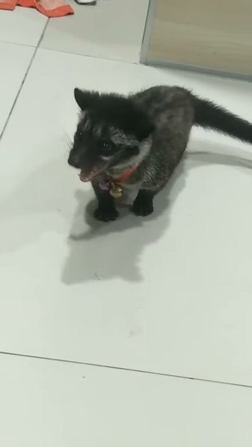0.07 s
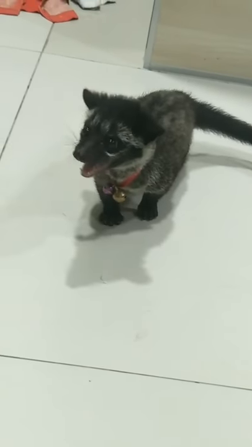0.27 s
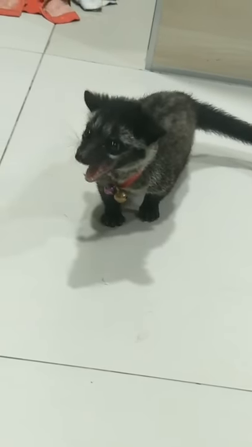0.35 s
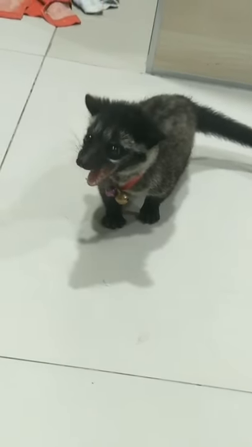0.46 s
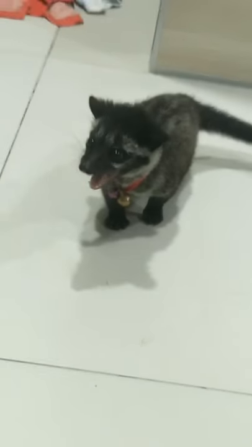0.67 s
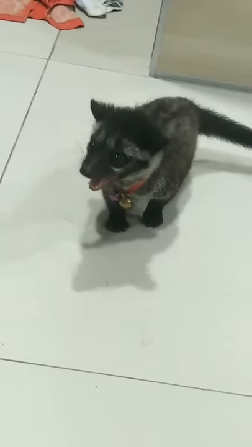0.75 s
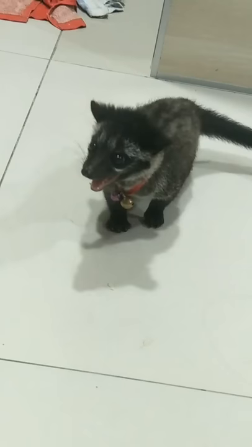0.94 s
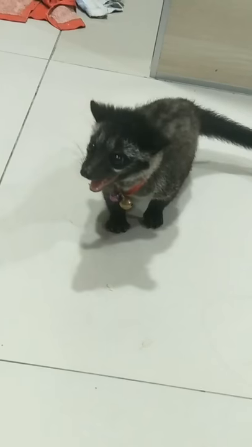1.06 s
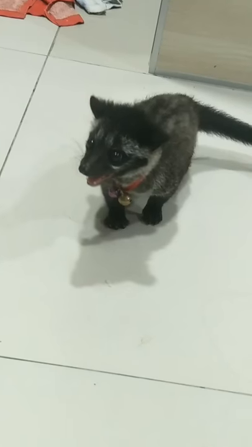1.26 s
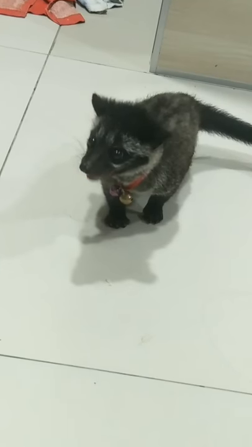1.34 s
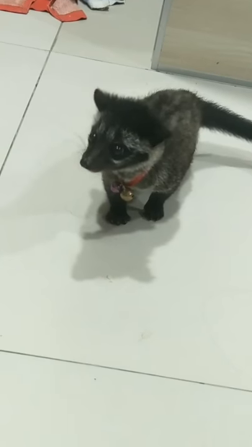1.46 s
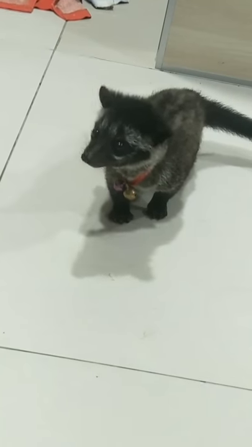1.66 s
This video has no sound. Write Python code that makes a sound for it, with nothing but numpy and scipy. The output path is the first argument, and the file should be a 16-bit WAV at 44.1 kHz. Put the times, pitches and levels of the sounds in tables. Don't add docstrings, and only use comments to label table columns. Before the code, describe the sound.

A small civet calls close by in a quick run of bright arched chirps, some with rough lead-ins, the last ones running together and sinking to a low murmur; hard tiled room, faint rumble behind.

```python
import sys
import numpy as np
from scipy import signal
from scipy.fft import rfft, irfft
from scipy.io import wavfile
from scipy.ndimage import uniform_filter1d

SR = 44100
rng = np.random.default_rng(int(sys.argv[2]) if len(sys.argv) > 2 else 0)


def volts_from_decibels(level):
    exponent = np.asarray(level, float) / 20
    return 10 ** exponent


def store_pcm(level_fs):
    pcm = np.round(np.clip(level_fs, -1, 1) * 32767).astype(np.int16)
    wavfile.write(sys.argv[1], SR, np.atleast_2d(pcm).T)


N = 74970


def at_hz(points, hz):
    f, value = np.transpose(points)
    return np.interp(np.log(hz + 1), np.log(f + 1), value)


def unit(x):
    return x / np.sqrt(np.mean(x ** 2) + 1e-20)


def wobble(n, size):
    smooth = uniform_filter1d(rng.standard_normal(n), size)
    return unit(uniform_filter1d(smooth, size))


def resonate(x, hz, width_hz):
    turn = np.exp(2j * np.pi * np.cumsum(hz * np.ones(len(x))) / SR)
    r = np.exp(-np.pi * width_hz / SR)
    return 2 * (turn * signal.lfilter([1 - r], [1, -r], x / turn)).real


def ring(noise, bands):
    return sum(volts_from_decibels(db) * unit(resonate(resonate(noise, hz, width_hz), hz, width_hz))
               for hz, width_hz, db in bands)


# frequency in Hz, level in dB per Hz.
AIR_SPECTRUM = [(25, -25), (50, -53), (100, 3), (190, 0), (400, -8), (900, -12.5), (1900, -12), (2600, -44)]
# frequency in Hz, width in Hz, level in dB.
HIGH_BANDS = [(1309, 24, -77.5), (2320, 92, -78.5), (4900, 230, -84), (5390, 77, -80.5), (5650, 250, -97),
              (7230, 280, -82)]


def room_tone():
    level_db, patch_db = -57, 5
    frames, hz = N // 256 + 5, np.fft.rfftfreq(1024, 1 / SR)
    a, b, patches = rng.standard_normal((frames, 513, 3)).T
    patches = uniform_filter1d(patches, size=8, axis=0)
    patches = unit(uniform_filter1d(patches, size=14, axis=1))
    z = (a + 1j * b) * volts_from_decibels(at_hz(AIR_SPECTRUM, hz)[:, None] + patch_db * patches)
    air = volts_from_decibels(level_db) * unit(signal.istft(z, nperseg=1024, noverlap=768)[1][:N])
    return air + ring(rng.standard_normal(N), HIGH_BANDS)


# time in seconds, level in dB, drone pitch in Hz.
RUMBLE_SWELL = [(0.0, -80, 212), (0.118, -57, 217), (0.16, -60.5, 217), (0.316, -69, 234),
                (0.676, -60, 214), (0.78, -47, 233), (0.932, -52.5, 237), (1.116, -54.5, 225.5),
                (1.182, -48.5, 261), (1.514, -51.5, 225), (1.594, -70, 231), (1.642, -55, 222),
                (1.7, -58.5, 216)]
# frequency in Hz, width in Hz, level in dB.
ROOM_MODES = [(216.4, 22, -11), (263, 84, -12.5), (313.7, 10, -13), (596, 250, -17), (1180, 16, -34)]


def rumble():
    drone_width_hz, drone_db = 37.5, -2
    hum_hz, hum_db = 59.4, -70
    s, db, drone_hz = np.transpose(RUMBLE_SWELL)
    t, noise = np.arange(N) / SR, rng.standard_normal(N)
    modes = ring(noise, ROOM_MODES)
    hz = np.interp(t, s, drone_hz)
    drone = resonate(resonate(noise[::-1], hz, drone_width_hz), hz, drone_width_hz)
    drone_power = abs(uniform_filter1d(drone ** 2, size=3000)) + 1e-12
    steady_drone = volts_from_decibels(drone_db) * drone / np.sqrt(drone_power)
    hum = volts_from_decibels(hum_db) * np.sqrt(2) * np.sin(2 * np.pi * hum_hz * t)
    return volts_from_decibels(np.interp(t, s, db)) * (modes + steady_drone) + hum


# frequency in Hz, 60 dB decay time in seconds, level in dB.
ROOM_DECAY = [(1200, 0.55, 0.5), (3980, 0.77, -6), (5000, 0.42, -7.5), (6100, 0.62, 2.5),
              (7260, 0.49, -10.5), (11100, 0.38, -1.5)]
# delay in seconds, level in dB.
EARLY_REFLECTIONS = [(.0045, -15), (.0083, -16), (.0131, -15), (.019, -16), (.027, -16)]


def room(x):
    direct_db, tail_db, onset_s = 2.5, -0.5, 0.0043
    taps = rng.standard_normal(SR) * (rng.random(SR) < .3)
    rows = np.array(ROOM_DECAY)
    hz, t, z = signal.stft(taps, SR, nperseg=256)
    start_db = at_hz(rows[:, ::2], hz)[:, None]
    t60_s = at_hz(rows[:, :2], hz)[:, None]
    tail = signal.istft(z * volts_from_decibels(start_db - 60 * t / t60_s), SR, nperseg=256)[1]
    tail *= np.minimum(np.arange(len(tail)) / SR / onset_s, 1)
    tail *= volts_from_decibels(tail_db) / np.linalg.norm(tail)
    tail[0] += volts_from_decibels(direct_db)
    for s, db in EARLY_REFLECTIONS:
        tail[round(s * SR)] += volts_from_decibels(db)
    return signal.fftconvolve(x, tail)[:N]


# frequency in Hz, gain in dB.
VOCAL_COLOUR = [(900, -20), (2000, -5), (3500, -2), (5000, 7.5), (7300, 1), (9000, -13), (10100, -17),
                (12300, -20.5)]


def folds(hz, overtone_db, first_db, slope_db, weak, air, third_db=0):
    turn = 2 * np.pi * np.cumsum(hz) / SR
    voice = air * (1 + np.cos(turn)) + 0 * hz
    for k in np.arange(1.5, 14, .5):
        line_hz = k * hz
        line_db = slope_db * np.maximum(k - 2, 0) + (k == 3) * third_db
        line_db = line_db - 13 * np.exp(-((line_hz - 6000) / 170) ** 2)
        line_db = line_db - 16 * np.exp(-((line_hz - 11000) / 1500) ** 4)
        radiated = np.clip((line_hz - 2100) / 600, .12, 1) * (line_hz < 15000)
        line = volts_from_decibels(line_db) * radiated * np.cos(k * turn)
        voice += line * (weak if k % 1 else 1 - 0.71 * weak)
    voice = voice * volts_from_decibels(overtone_db - at_hz(VOCAL_COLOUR, 2 * hz))
    thin_db = -3 * np.exp(-((hz - 2050) / 450) ** 2)
    voice = voice + volts_from_decibels(first_db + thin_db - at_hz(VOCAL_COLOUR, hz)) * np.cos(turn)
    u = np.arange(len(hz)) / SR
    edge_s = 0.0016
    return np.sqrt(2) * voice * np.clip(np.minimum(u, u[::-1]) / edge_s, 0, 1)


# time in seconds, pitch in Hz, overtone level in dB, fundamental level in dB.
EARLY_CHIRPS = [
    [(0.213, 2000, -72, -66), (0.221, 2380, -51, -58), (0.230, 2920, -42, -47), (0.234, 3450, -37, -39),
     (0.246, 4120, -31, -31), (0.255, 4117, -39, -35), (0.263, 3400, -31, -38), (0.274, 2310, -26.5, -65),
     (0.287, 1420, -80, -65)],
    [(0.333, 1991, -39, -71), (0.341, 2489, -26, -53), (0.348, 2914, -36, -45), (0.354, 3550, -24, -34),
     (0.366, 3920, -33, -36), (0.386, 3780, -27, -39), (0.396, 3000, -32, -44), (0.407, 2000, -42, -60),
     (0.418, 1250, -58, -68)],
    [(0.484, 3136, -32, -56), (0.496, 3487, -28, -37), (0.506, 3656, -22.5, -40), (0.512, 3693, -26, -33),
     (0.518, 3560, -21, -41), (0.525, 3100, -28, -43), (0.532, 2620, -34, -52), (0.541, 2200, -48, -70),
     (0.556, 1730, -54, -81)],
]
SECOND_RUN_UP = [
    (0.302, 1510, -48, -53.5),
    (0.314, 1656, -43.5, -51),
    (0.324, 1775, -44.5, -43.5),
]
MIDDLE_CHIRPS = [
    [(0.632, 3050, -42, -48), (0.64, 3190, -32.5, -39), (0.656, 3330, -22, -37), (0.668, 3200, -28, -40),
     (0.674, 2745, -28.5, -58), (0.68, 2341, -28.5, -45), (0.686, 1892, -44, -65), (0.694, 1585, -58, -68),
     (0.704, 1430, -60, -72)],
    [(0.806, 3020, -44, -46), (0.820, 3250, -36, -40), (0.824, 3300, -25, -39), (0.833, 3470, -23.5, -37),
     (0.842, 3150, -29, -42), (0.849, 2650, -30, -53), (0.855, 2250, -46, -70), (0.866, 1800, -60, -70),
     (0.876, 1470, -72, -51)],
    [(0.972, 2688, -34, -74), (0.99, 3259, -30.5, -36.5), (1.004, 3300, -29, -49), (1.014, 3025, -29, -46),
     (1.022, 2504, -26.5, -64), (1.03, 1800, -46, -60), (1.048, 1310, -49, -59), (1.076, 1205, -49, -61),
     (1.096, 1225, -50, -61)],
]
JOINED_CHIRPS = [
    [(1.112, 1272, -50, -61), (1.12, 1290, -48, -60), (1.138, 1558, -45, -55), (1.154, 2185, -36, -54),
     (1.166, 2287, -35, -50), (1.194, 2150, -40, -49), (1.21, 1822, -42, -51), (1.226, 1515, -45, -51),
     (1.236, 1572, -45, -51)],
    [(1.258, 1385, -47, -54), (1.28, 1665, -41, -52), (1.294, 1858, -40, -52), (1.312, 2600, -28, -52),
     (1.324, 2940, -31, -44), (1.338, 3153, -28, -42), (1.35, 2776, -26, -51), (1.36, 2015, -40.5, -36.5),
     (1.374, 1308, -43.5, -61.5)],
    [(1.387, 1001, -62, -60), (1.402, 960, -60, -56), (1.413, 1150, -54, -68), (1.428, 1125, -52, -50),
     (1.441, 1097, -62, -51), (1.452, 1120, -66, -64), (1.463, 1117, -64, -56), (1.475, 1100, -80, -74)],
]
# start in seconds, end in seconds, share from 0 to 1.
PULSING = [
    (0.488, 0.502, 0.46),
    (0.82, 0.838, 0),
    (0.96, 0.996, 0.81),
]


def chirps(t, jitter, breath):
    out = np.zeros(N)
    half = sum(share * np.clip(np.minimum(t - a, b - t) / 0.0035, 0, 1) for a, b, share in PULSING)
    half = np.clip(half, 0, 1)
    run_together = MIDDLE_CHIRPS[2] + sum(JOINED_CHIRPS, [])
    calls = [EARLY_CHIRPS[0], SECOND_RUN_UP + EARLY_CHIRPS[1], EARLY_CHIRPS[2],
             MIDDLE_CHIRPS[0], MIDDLE_CHIRPS[1], run_together]
    for call in calls:
        s, pitch_hz, overtone_db, first_db = np.transpose(sorted(call))
        on = (t >= s[0]) & (t < s[-1])
        hz = uniform_filter1d(np.interp(t[on], s, pitch_hz), size=200, mode="nearest")
        hz = hz * (1 + 0.0053 * jitter[on])
        over_db = np.interp(t[on], s, overtone_db)
        slope_db = -4.5 + 0.24 * (over_db + 34.5)
        slope_db += 4 * np.maximum(np.log2(2400 / hz), 0)
        third_db = 5 * np.clip((1330 - hz) / 150, 0, 1)
        out[on] += folds(hz, over_db, np.interp(t[on], s, first_db), slope_db, half[on],
                         volts_from_decibels(-76) * breath[on], third_db)
    return out


# start in seconds, end in seconds, pitch in Hz,
# overtone level in dB, fundamental level in dB.
SOFT_PIP = (0.184, 0.204, 1640, -66, -52)


def pip(t, jitter):
    out = np.zeros(N)
    a, b, pip_hz, overtone_db, first_db = SOFT_PIP
    on = (t >= a) & (t < b)
    swell = np.sin(np.pi * (t[on] - a) / (b - a))
    out[on] = swell * folds(pip_hz * (1 + .02 * jitter[on]), overtone_db, first_db, -22, 0, 0)
    return out


# start in seconds, end in seconds,
# start pitch in Hz, end pitch in Hz, level in dB.
ROUGH_LEAD_INS = [
    (0.444, 0.486, 1097, 1300, -48),
    (0.591, 0.639, 757, 1016, -44),
    (0.778, 0.811, 720, 1050, -41),
    (0.926, 0.979, 899, 1350, -44),
]


def lead_ins(t, jitter, breath):
    out = np.zeros(N)
    for a, b, low_hz, high_hz, db in ROUGH_LEAD_INS:
        on = (t >= a) & (t < b)
        rise = (t[on] - a) / (b - a)
        hz = (low_hz + (high_hz - low_hz) * rise ** 1.6) * (1 + .006 * jitter[on])
        swell_db = db - 4.5 - 16 * (1 - rise) ** 2
        out[on] += folds(hz, swell_db, swell_db - 20, -.8, 0, volts_from_decibels(-13) * breath[on])
    return out


def rasp(t):
    start_s, end_s, rise_s = 0.208, 1.477, 0.071
    level_db, flicker_db = -39.5, 2
    span = np.clip(np.minimum(t - start_s, end_s - t) / rise_s, 0, 1)
    return span * volts_from_decibels(level_db + flicker_db * wobble(N, size=1800)) * rng.standard_normal(N)


def civet():
    t = np.arange(N) / SR
    jitter, shimmer = wobble(N, size=60), wobble(N, size=90)
    breath = rng.standard_normal(N)
    source = chirps(t, jitter, breath) + pip(t, jitter) + lead_ins(t, jitter, breath) + rasp(t)
    source *= volts_from_decibels(1.5 * shimmer)
    return irfft(rfft(source) * volts_from_decibels(at_hz(VOCAL_COLOUR, np.fft.rfftfreq(N, 1 / SR))), N)


def scene():
    return (room(civet()) + room_tone() + rumble())[None]


# time in seconds, centre in Hz.
TREBLE_HOLE = [(0.22, 10480), (0.45, 9330), (0.6, 9400), (0.66, 10670), (1.5, 10590)]


def treble_gate(x):
    hz, t, z = signal.stft(x, SR, nperseg=1024)
    offset_hz = hz[:, None] - np.interp(t, *np.transpose(TREBLE_HOLE))
    z = z * volts_from_decibels(-18 * np.exp(-(offset_hz / 460) ** 4))
    power = abs(uniform_filter1d(abs(z) ** 2, size=16, axis=0)) + 1e-20
    band_db = (10 * np.log10(power))[::16].repeat(16, axis=0)[:len(hz)]
    floor_db, below_loudest_db, soft_db = -97, 44, 1.5
    over_db = band_db - np.maximum(band_db.max(axis=0) - below_loudest_db, floor_db)
    keep = np.where(hz[:, None] > 8600, np.clip(over_db / soft_db, 0, 1), 1)
    keep = keep * (hz[:, None] < 13750)
    return signal.istft(z * keep, SR, nperseg=1024)[1][None, :N]


def top_cut(x):
    return signal.sosfilt(signal.butter(12, 14160, fs=SR, output="sos"), x)


def record(dry):
    mix = treble_gate(dry[0])
    return top_cut(mix)


dry = scene()
out = record(dry)
store_pcm(out)
```